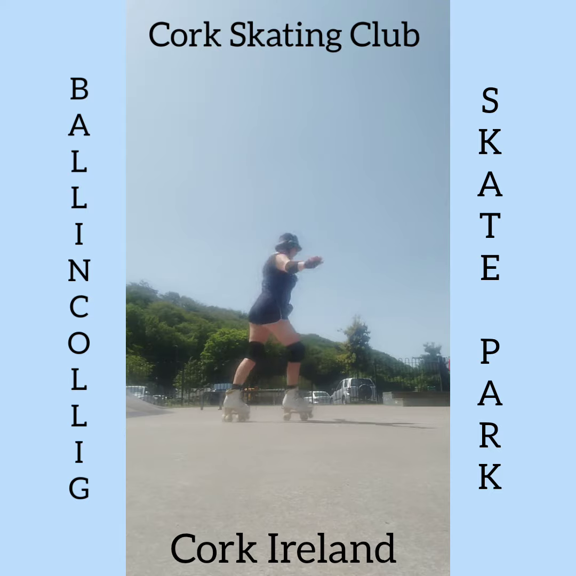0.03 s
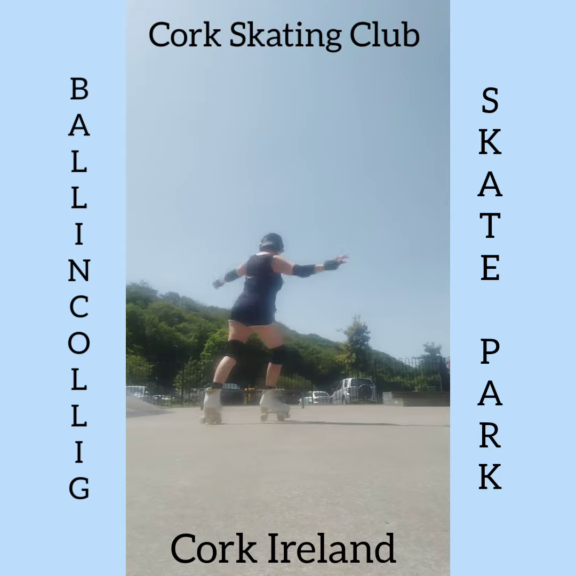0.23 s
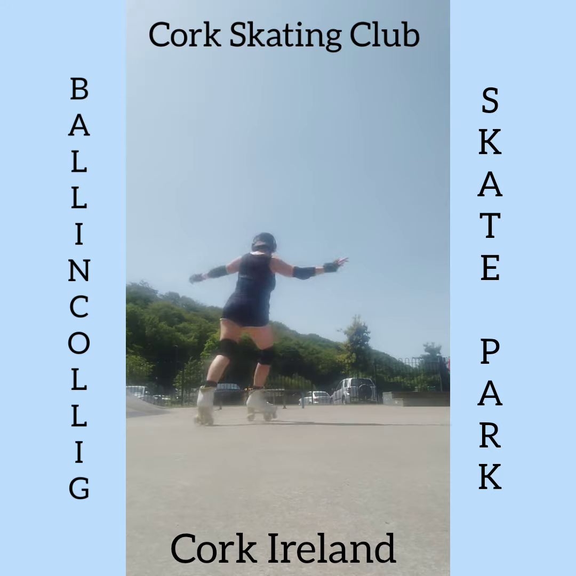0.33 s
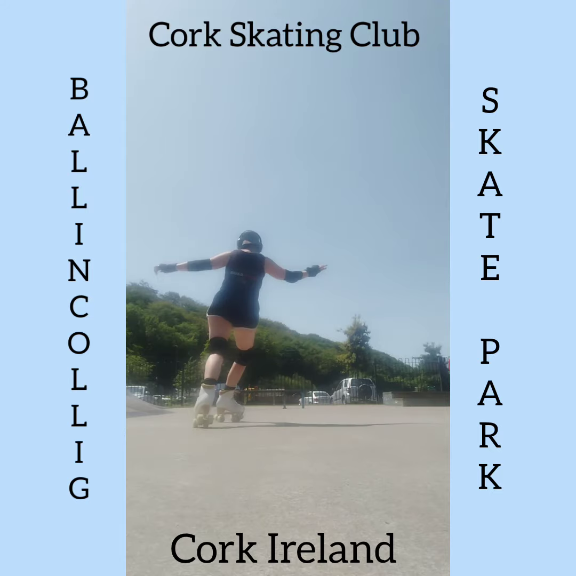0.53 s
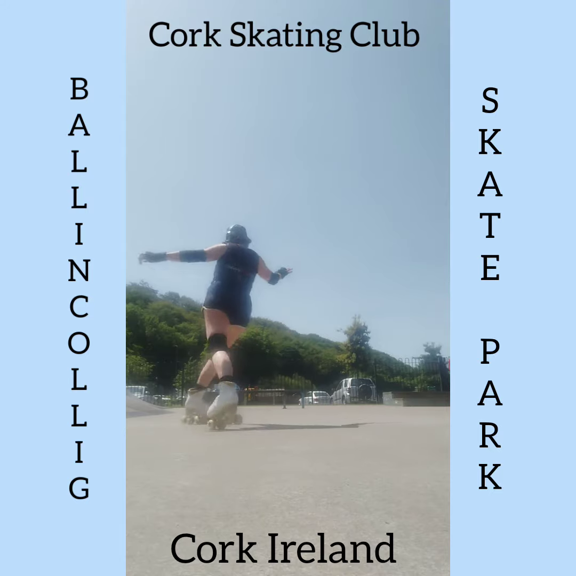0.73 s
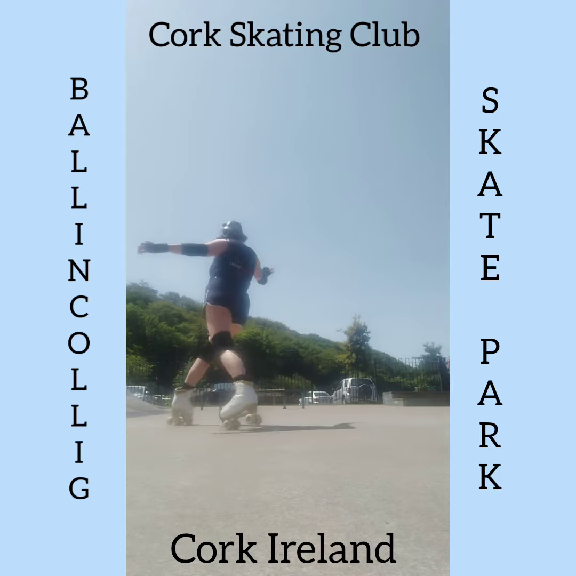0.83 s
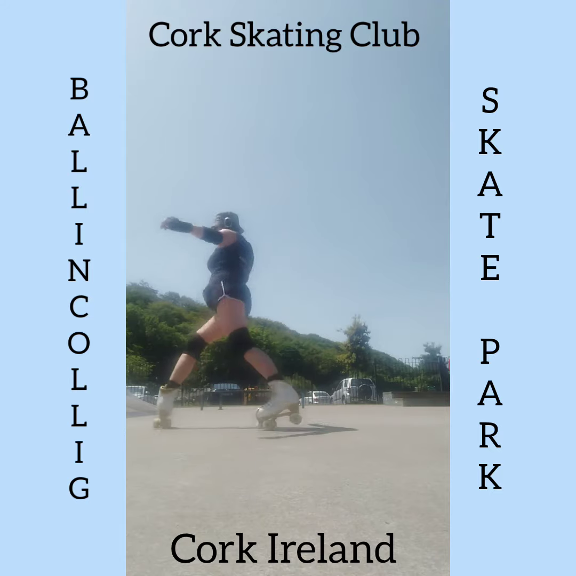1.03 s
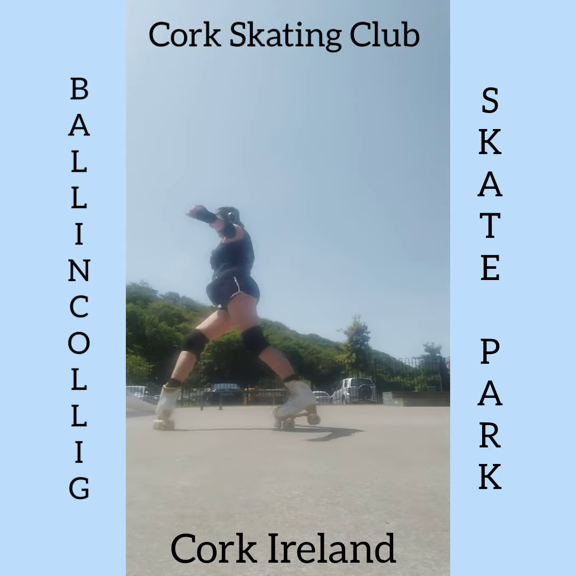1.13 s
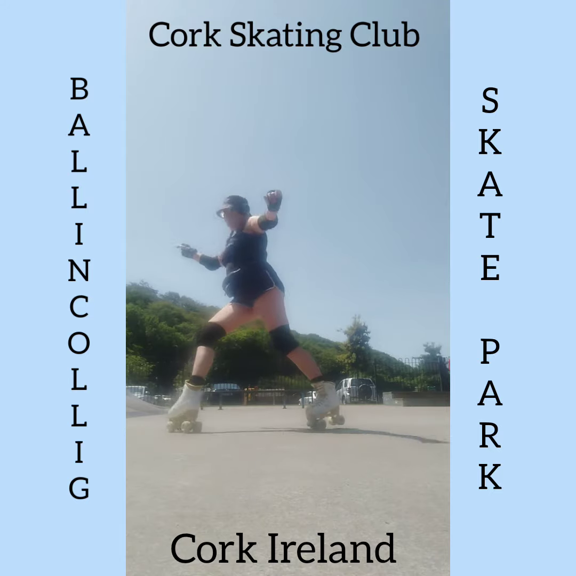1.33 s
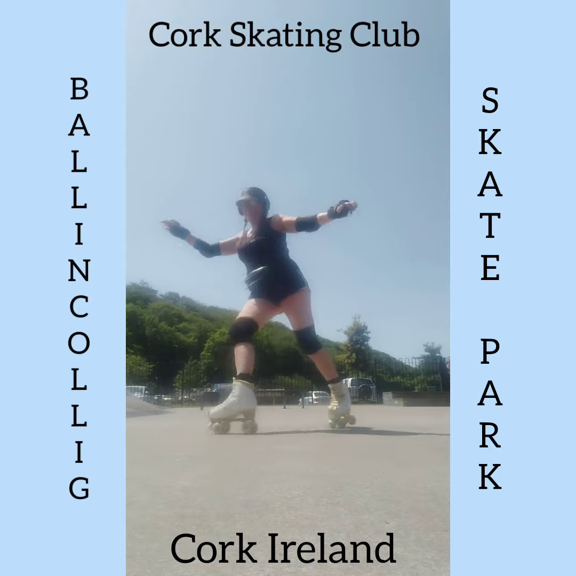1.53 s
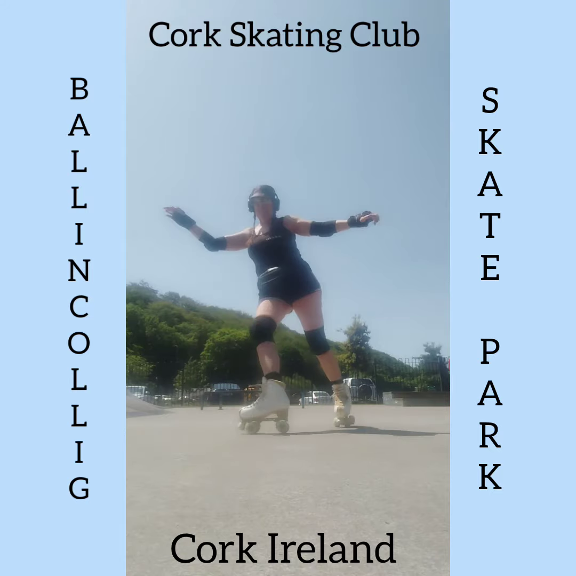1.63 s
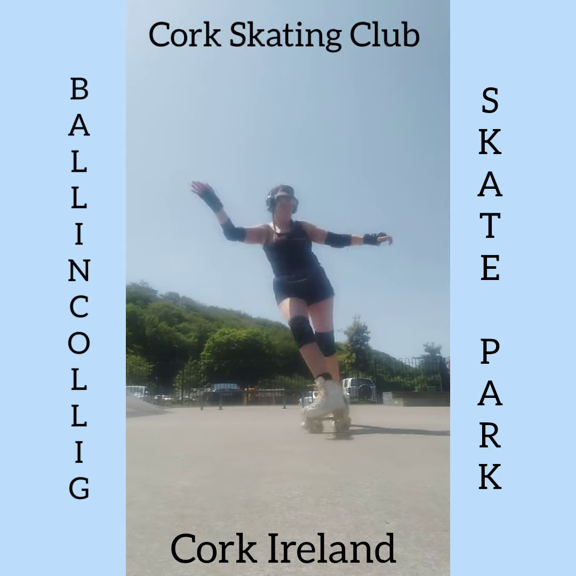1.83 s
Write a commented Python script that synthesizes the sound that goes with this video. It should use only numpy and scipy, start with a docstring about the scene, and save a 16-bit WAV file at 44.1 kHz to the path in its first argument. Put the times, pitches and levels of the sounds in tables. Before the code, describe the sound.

Roller skates roll over concrete outdoors, with a soft knock and a tap. Then the wheels land in a quick, loud clatter and skid briefly over grit, while light wind buffets the microphone.

```python
"""A skater on quad roller skates turns on the concrete of an open-air skate park.
From the start, light wind buffets the microphone and the wheels rumble and swish over the slab.
A soft knock comes at 0.45 s and one skate taps down at 0.9 s. From 1.25 s a landing clatters,
wheel after wheel; a high hiss swells, and the wheels scuff and skid over the grit, then fade.
Tap and landing scatter back from ramps and trees as a bright tail, with faint blurred echoes."""
import sys
import numpy as np
from scipy import signal
from scipy.fft import rfft, irfft
from scipy.io import wavfile

SR = 44100
rng = np.random.default_rng(int(sys.argv[2]) if len(sys.argv) > 2 else 0)


def generate_wav(signal):
    """Clip the signal to [-1, 1] and save it as 16-bit WAV at the path in sys.argv[1]."""
    frames = np.transpose(np.atleast_2d(signal))
    scaled = np.clip(frames, -1, 1) * 32767
    pcm = np.round(scaled).astype(np.int16)
    wavfile.write(sys.argv[1], SR, pcm)


N = 83790
T = np.arange(N) / SR


def from_db(db):
    """Decibels to gain."""
    return 10 ** (np.asarray(db) / 20)


def unit_rms(x):
    """Scale to unit power."""
    return x / np.sqrt(np.mean(x ** 2) + 1e-20)


def over_hz(points):
    """Interpolate (Hz, value) rows at every FFT bin, in log frequency."""
    hz, value = np.transpose(points)
    bins_hz = np.arange(N + 1) * SR / (2 * N)
    return np.interp(np.log(bins_hz + 1), np.log(hz), value)


def colour(x, points):
    """Filter by (Hz, dB) rows."""
    return irfft(rfft(x, 2 * N) * from_db(over_hz(points)))[..., :N]


def butter(x, hz, kind):
    """Second-order low- or high-pass."""
    return signal.sosfilt(signal.butter(2, hz, kind, fs=SR, output="sos"), x)


def ring(force, hz, t60_s):
    """One damped mode; a unit click rings it at height 1."""
    r = from_db(-60 / (t60_s * SR))
    w = 2 * np.pi * hz / SR
    return signal.lfilter([.5, 0, -.5], [1, -2 * r * np.cos(w), r * r], force + 1e-18)


def envelope(points):
    """Gain along (s, dB) rows."""
    return from_db(np.interp(T, *np.transpose(points)))


def flutter(rms_db, rate_hz):
    """Gain that wavers at random."""
    r = np.exp(-2 * np.pi * rate_hz / SR)
    slow = signal.lfilter([1], [1, -2 * r, r * r], rng.standard_normal(2 * N))[N:]
    return from_db(rms_db * unit_rms(slow))


def stereo(pair, correlation):
    """Mix two unrelated signals into left and right with a given correlation."""
    c = np.clip(correlation, -.99, .99)
    mid, side = rfft(pair, 2 * N)
    return irfft(np.sqrt(1 + c) * mid + np.sqrt(1 - c) * side * [[1], [-1]])[:, :N]


# Sound from all around. Each row: frequency in Hz, left-right correlation.
DIFFUSE_CORRELATION = [(100, 1), (500, 0.94), (1000, 0.92), (1800, 0.46), (2800, -0.25), (4200, -0.26),
                       (6300, 0.19), (10000, 0.046)]

def diffuse(pair):
    """Sound from all around: left and right alike in the bass, mostly unrelated in the treble."""
    return stereo(pair, over_hz(DIFFUSE_CORRELATION))


# Each row: time in s, level in dB.
HISS_LEVEL = [(0, -67.5), (.7, -67.5), (1.0, -67.5), (1.45, -50.5), (1.9, -74)]
# Each row: frequency in Hz, relative density in dB.
HISS_SPECTRUM = [(1000, 0), (2500, 4.5), (4500, -8), (5700, -12.5), (7500, -10.5), (10000, -10),
                 (12000, -19), (13500, -38), (15500, -42)]

def hiss():
    """High open-air hiss that swells around the landing."""
    noise = colour(diffuse(rng.standard_normal((2, N))), HISS_SPECTRUM)
    return unit_rms(noise) * envelope(HISS_LEVEL) * flutter(rms_db=.3, rate_hz=26)


# Each row: time in s, level in dB, left minus right in dB.
WIND_GUSTS = [(0, -44.5, -3.5), (.18, -45.5, -4), (.23, -38, -16), (.28, -48, -17.5), (.39, -40.5, -7),
              (.44, -36.5, -9), (0.501, -43.5, -1.5), (.9, -44, 4), (1.36, -37.5, -9), (1.6, -45, 1),
              (1.9, -50, 4)]
# Each row: frequency in Hz, relative density in dB.
WIND_SPECTRUM = [(15, -1.5), (30, 3), (50, 6), (85, 0.5), (130, -10.5), (220, -19.5), (500, -81)]

def wind():
    """Wind buffets the microphone: a lumpy low rumble, mostly separate on each side."""
    time_s, level_db, balance_db = np.transpose(WIND_GUSTS)
    noise = colour(stereo(rng.standard_normal((2, N)), correlation=.28), WIND_SPECTRUM)
    gusts = from_db(np.interp(T, time_s, level_db)) * flutter(rms_db=2, rate_hz=9.1)
    balance = from_db(np.interp(T, time_s, balance_db) * [[.5], [-.5]])
    return unit_rms(noise) * gusts * balance


def reflections(shape, spectrum):
    """Diffuse stereo impulse response with a given envelope and spectrum."""
    noise = colour(diffuse(rng.standard_normal((2, N))), spectrum) / np.sqrt(2)
    return noise * shape / np.linalg.norm(shape)


# Scatter off ramps and trees. Each row: frequency in Hz, gain in dB.
SCATTER_SPECTRUM = [(150, -20), (300, -9), (600, -12.5), (1100, -5), (1800, -6.5), (2800, 2.5), (4300, 5.5),
                    (6500, 6.5), (9800, 16.5), (12000, 12), (13500, -12), (15500, -22)]
# Echoes off distant banks. Each row: delay in s, width in s, gain in dB.
BANK_ECHOES = [(0.252, 0.0075, -16), (0.295, 0.013, -18)]
# Each row: frequency in Hz, gain in dB.
ECHO_SPECTRUM = [(200, -3), (600, -11.5), (1200, 1.5), (1800, 0), (2500, 1.5), (3500, 11), (5000, -3),
                 (8000, -9), (13000, -15)]

def park(x, near_t60_s=.16, far_t60_s=1.22):
    """Scatter dies fast off near ramps, slowly off far trees; distant banks return blurred echoes."""
    onset_s, rise_s = .0011, .064
    rise = np.clip((T - onset_s) / rise_s, 0, 1)
    ramps = from_db(-60 * T / near_t60_s)
    trees = from_db(-14 - 60 * T / far_t60_s)
    response = reflections(rise * (ramps + trees), SCATTER_SPECTRUM)
    for delay_s, width_s, db in BANK_ECHOES:
        blur = np.exp(-((T - delay_s) / width_s) ** 2)
        response += from_db(db) * reflections(blur, ECHO_SPECTRUM)
    lean_right = from_db([[-1.1], [1.1]])
    return signal.fftconvolve(x[None], response, axes=1)[:, :N] * lean_right


def direct(x):
    """The straight path: alike on both sides in the bass, smeared apart in the treble."""
    smear = rng.standard_normal(SR // 400)
    smeared = signal.fftconvolve(x, smear / np.linalg.norm(smear))[:N]
    side = from_db(-3) * butter(smeared, hz=1500, kind="high")
    return x + side * [[1], [-1]]


# Each row: time in s, level in dB.
SWISH_LEVEL = [(0, -75), (.14, -73), (.22, -80), (.33, -72), (.52, -65.5), (.68, -75), (.95, -69),
               (1.3, -68), (1.65, -66.5), (1.9, -60.5)]
# Each row: frequency in Hz, relative density in dB.
SWISH_SPECTRUM = [(3500, -23), (4800, -7.5), (5600, 2.5), (6600, -3), (7500, -1), (8600, -10), (10000, -10),
                  (13000, -20)]

def swish():
    """Spinning wheels and bearings give a narrow high swish that swells in the glide."""
    noise = colour(stereo(rng.standard_normal((2, N)), correlation=.5), SWISH_SPECTRUM)
    return unit_rms(noise) * envelope(SWISH_LEVEL)


def clicks(per_s, shape):
    """Unit impulses of random time and sign."""
    return (rng.random(shape) < per_s / SR) * rng.choice([-1, 1], shape)


def grit(spectrum, grains_per_s, spread_db):
    """Small bumps of uneven size, in stereo, at unit power."""
    bumps = clicks(grains_per_s, (2, N))
    sizes = from_db(spread_db * np.minimum(rng.exponential(1, (2, N)), 4))
    return unit_rms(colour(diffuse(bumps * sizes), spectrum))


# Each row: time in s, level in dB.
ROLL_LEVEL = [(0, -48.5), (.25, -49.5), (.62, -47), (.88, -48), (1.0, -47), (1.22, -47.5), (1.42, -44.5),
              (1.62, -48), (1.9, -46.5)]
# Each row: frequency in Hz, relative density in dB.
ROLL_SPECTRUM = [(60, 8.5), (130, 4), (250, 2), (420, -0.5), (650, -2.5), (1000, -9.5), (1500, -13.5),
                 (2300, -29), (4000, -33), (9000, -47)]

def rolling():
    """Wheels rumble over countless small bumps in the concrete."""
    rumble = grit(ROLL_SPECTRUM, grains_per_s=3500, spread_db=1.5)
    return rumble * envelope(ROLL_LEVEL) * flutter(rms_db=.52, rate_hz=34)


# Each row: time in s, level in dB.
SKID_LEVEL = [(1.33, -81), (1.38, -34.5), (1.42, -37.5), (1.48, -39), (1.55, -45.5), (1.64, -48),
              (1.72, -56), (1.9, -65)]
# Each row: frequency in Hz, relative density in dB.
SKID_SPECTRUM = [(250, -15), (500, -5.5), (850, -1), (1200, -3), (1500, -3), (1900, -1), (2600, 0),
                 (3200, -0.5), (3900, -7), (5000, -8.5), (8000, -19), (13000, -39)]

def skid():
    """The landed wheels scrape sideways over the grit, brighter than when they roll."""
    return grit(SKID_SPECTRUM, grains_per_s=5000, spread_db=4.5) * envelope(SKID_LEVEL)


# Each row: start in s, length in s, level in dB, centre in Hz.
# The rows at 1.15, 1.575 and 1.611 s are echoes; the rest are wheel scuffs.
SHORT_RASPS = [(0.942, .01, -57.5, 3400), (0.974, 0.0092, -52, 3400), (1.15, 0.029, -55, 1502),
               (1.284, 0.021, -36.5, 874), (1.303, 0.054, -34, 656), (1.366, 0.058, -34, 478),
               (1.575, 0.03, -52.5, 3160), (1.611, 0.04, -50, 1830)]

def rasps(clicks_per_s=2500, ring_cycles=4):
    """Wheel scuffs, plus faint blurred echoes of the tap and landing about a quarter second later."""
    out = np.zeros(N)
    for start_s, length_s, db, hz in SHORT_RASPS:
        progress = np.clip((T - start_s) / length_s, 0, 1)
        swell = np.sqrt(np.abs(np.sin(np.pi * progress)))
        t60_s = ring_cycles / hz
        crackle = clicks(clicks_per_s, N)
        rasp = ring(ring(crackle, hz, t60_s), hz, t60_s)
        out += from_db(db) * swell * unit_rms(rasp)
    return out


# Each row: frequency in Hz, gain in dB, T60 in s.
SKATE_RESONANCES = [(382, -10, .026), (542, -9, 0.026), (649, -5.5, 0.04), (880, -9, 0.0076),
                    (1162, -9.5, 0.019), (1420, -14, 0.0078), (1754, -3.5, 0.0093), (2230, -6.5, 0.0088),
                    (2610, -5.5, 0.0061), (2970, -10, 0.0068), (3400, -16, 0.011), (4400, -25, 0.003),
                    (5600, -14, 0.0056), (8170, -11, 0.0011)]

def skate(forces, boot_db, pitch_ratio, boot_below_hz=1000):
    """Wheel, plate and boot ring together; pitch and the boot's share vary with wheel and load."""
    out = 0
    for k, (hz, db, t60_s) in enumerate(SKATE_RESONANCES):
        gain = from_db(db + boot_db * (hz < boot_below_hz))
        out += (-1) ** k * gain * ring(forces[k], hz * pitch_ratio, t60_s)
    return out


# Wheels touching down. Each row: start in s, blow level in dB, hardness as cut-off in Hz,
# thud level in dB, extra boot ring in dB, pitch ratio of the modes.
TOUCHDOWNS = [(.4490, -38.5, 800, -38, 2.5, 0.83), (.4540, -39, 750, -39, -1.5, 1.05),
              (.9062, -28.5, 3100, -55, -3.5, 1.13), (0.9081, -26.5, 2870, -23.5, 0.5, 0.93),
              (0.9147, -43.5, 4000, -41, 8.5, 1.025), (.9525, -36.5, 1400, -34, -2, 0.92),
              (0.995, -49, 800, -29.5, 0, 1.4), (1.2548, -24.5, 2400, -40, 2, 1.05),
              (1.2652, -24.5, 2280, -40, 0, 1.08), (1.2761, -27.5, 1890, -22, -1, 1.1),
              (1.2865, -18.5, 940, -24, -0.5, 1.057), (1.2916, -19, 1090, -31, -4, 1.01),
              (1.315, -27, 805, -22, -4, 0.94), (1.3262, -16, 1110, -22.5, -1, 1.088),
              (1.3291, -14.5, 6540, -25.5, -7.5, 0.983), (1.3357, -14.5, 4570, -38, -3, 0.996),
              (1.3368, -12, 1670, -25.5, 2, 0.973), (1.351, -23, 2600, -28, -6, 0.99),
              (1.3660, -15.5, 900, -25, -0.5, 1.032), (1.3698, -17.5, 3800, -48, 3, 1.03),
              (1.387, -35, 1390, -32, -1, 1.05), (1.417, -24, 900, -35, 6, 1)]

def knocks(crunch_t60_s=.029):
    """Each touch, a blow and a crunch of grit, rings the skate; the weight thuds through the boot."""
    size = SR // 8
    crunch_decay = from_db(-60 * T[:size] / crunch_t60_s)
    clacks, weight = np.zeros(N + size), np.zeros(N)
    for start_s, blow_db, hardness_hz, thud_db, boot_db, pitch_ratio in TOUCHDOWNS:
        crunch = rng.standard_normal((len(SKATE_RESONANCES), size)) * crunch_decay
        crunch /= np.linalg.norm(crunch, axis=1, keepdims=True)
        blow = signal.unit_impulse(size) + crunch
        blow /= np.linalg.norm(blow, axis=1, keepdims=True)
        forces = from_db(blow_db) * butter(blow, hardness_hz, "low")  # softened by the wheel
        start = int(start_s * SR)
        clacks[start:start + size] += skate(forces, boot_db, pitch_ratio)
        weight[start] += from_db(thud_db)
    thuds = ring(butter(weight, hz=600, kind="low"), hz=257, t60_s=.019)
    return clacks[:N] + thuds


def scene():
    """Knocks and rasps with their reflections, over rolling, skid, hiss, wind and swish."""
    hits = knocks() + rasps()
    return direct(hits) + park(hits) + rolling() + skid() + hiss() + wind() + swish()


# Microphone port mismatch. Each row: frequency in Hz, left minus right in dB.
MIC_BALANCE = [(600, -0.24), (2000, -2), (4000, -0.5), (6000, -4), (9000, 1.5), (13000, 7)]

def record(dry, stopband_hz=15700):
    """The two microphone ports colour the treble unequally; the top is cut steeply."""
    balance = from_db(over_hz(MIC_BALANCE) * [[.5], [-.5]])
    ports = irfft(rfft(dry, 2 * N) * balance)[:, :N]
    lowpass = signal.cheby2(14, 70, stopband_hz, fs=SR, output="sos")
    return signal.sosfilt(lowpass, ports)


dry = scene()
out = record(dry)
generate_wav(out)
```